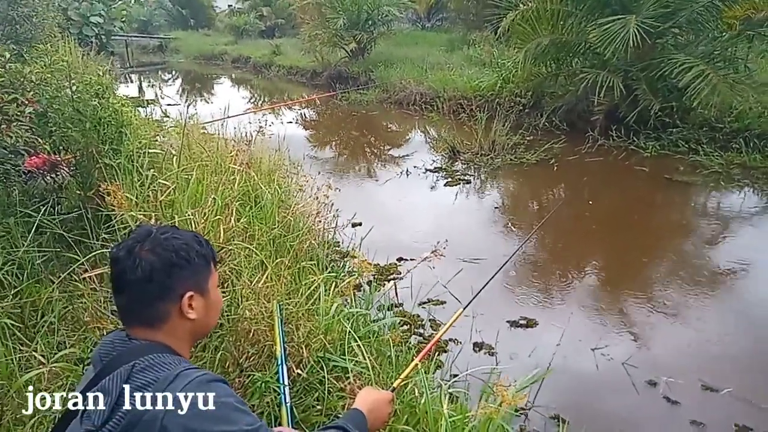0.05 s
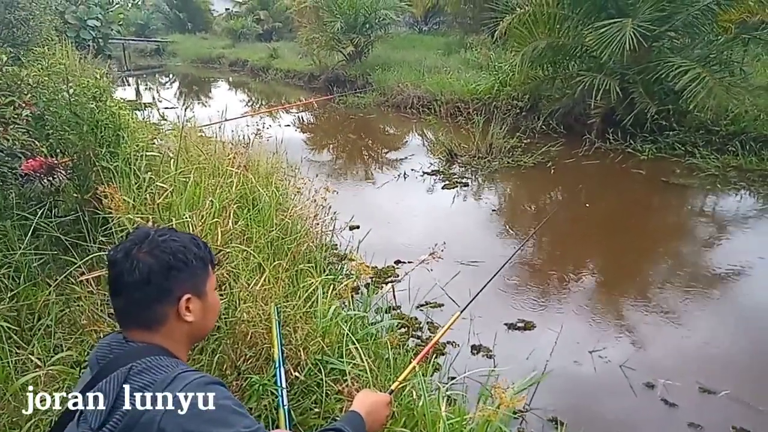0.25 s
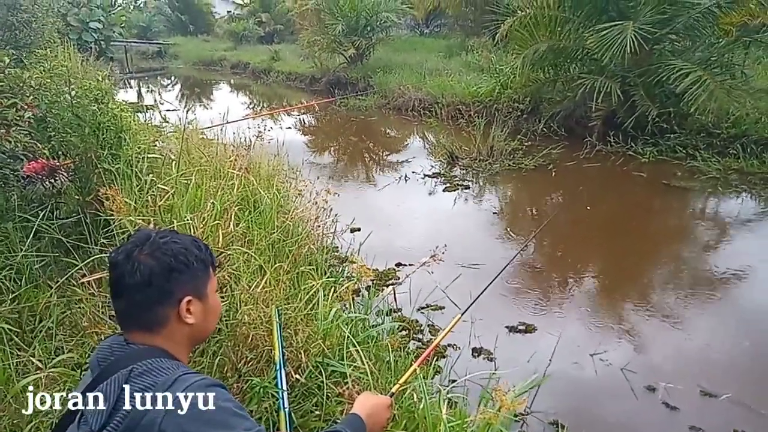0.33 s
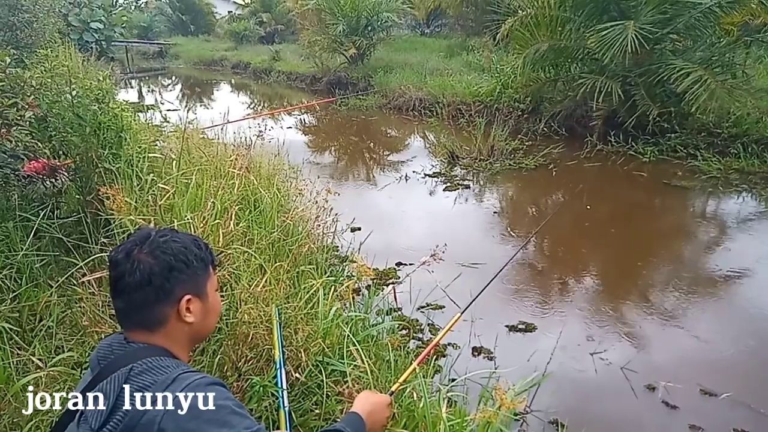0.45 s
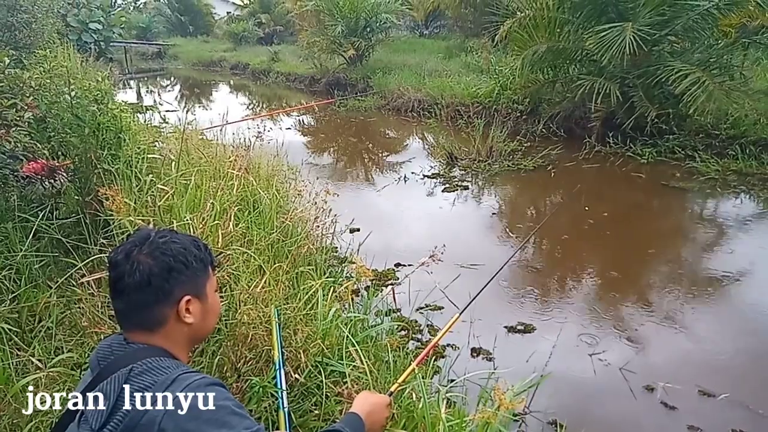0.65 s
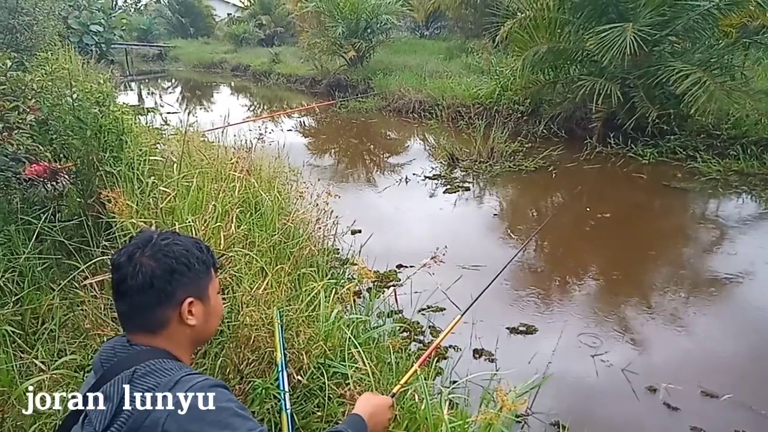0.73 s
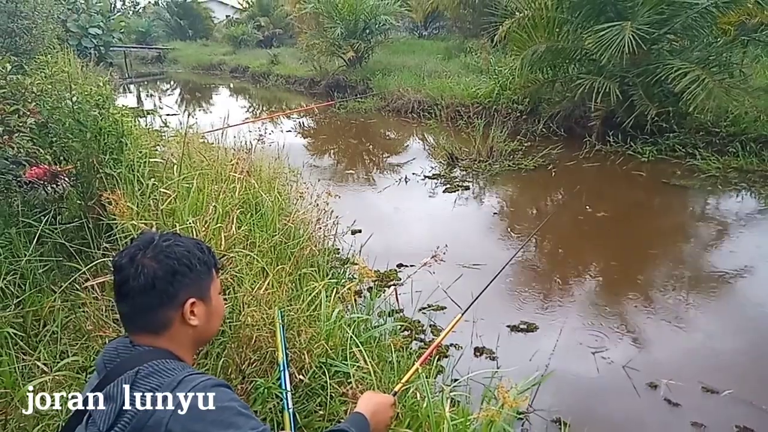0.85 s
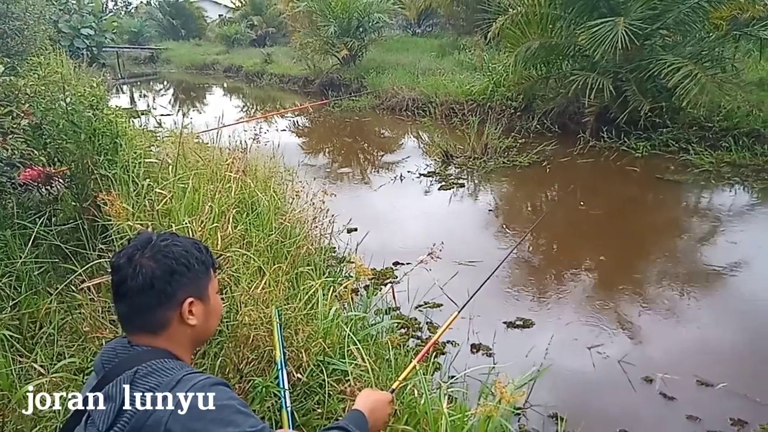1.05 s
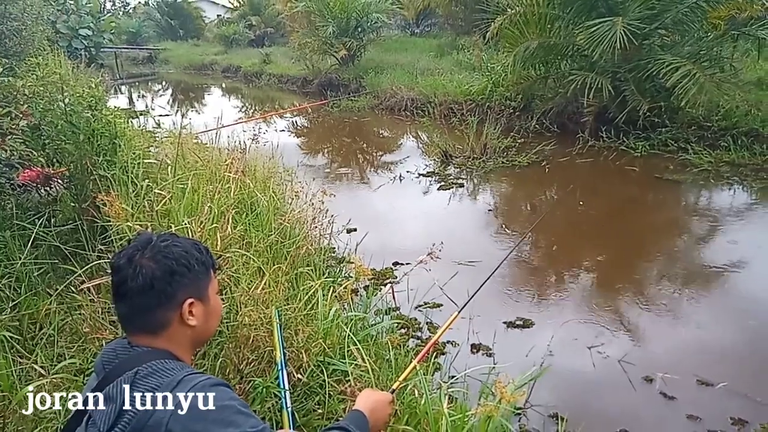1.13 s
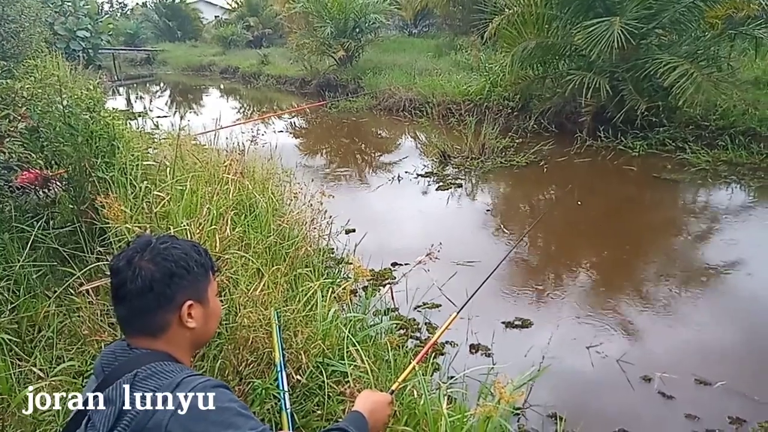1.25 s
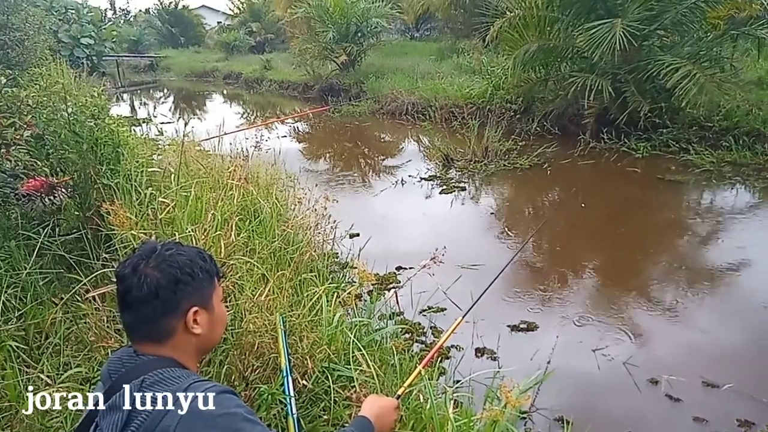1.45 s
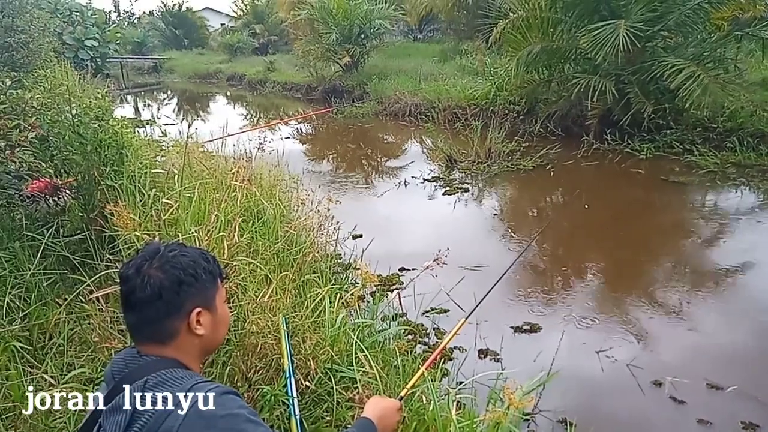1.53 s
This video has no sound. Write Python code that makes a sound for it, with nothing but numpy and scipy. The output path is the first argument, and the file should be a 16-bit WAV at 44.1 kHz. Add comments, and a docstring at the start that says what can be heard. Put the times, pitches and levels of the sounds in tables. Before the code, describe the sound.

A single plop sounds at the edge of a still pond, followed by a few falling drops and tiny bubbles. The banks echo faintly, while insects hiss and distant birds chirp over a low outdoor rumble.

```python
"""One plop at the edge of a still pond: a pocket of air booms and the water slaps shut over it,
then drops fall back and a few small bubbles rise. The air pockets ring as gliding sines, the slap is
a cluster of short tones, spray and drops are shaped noise and ticks, and the banks echo faintly.
Behind it insects hiss in the grass, far birds chirp, and a low outdoor rumble lies under it all."""
import sys
import numpy as np
from scipy import signal
from scipy.fft import rfft, irfft
from scipy.io import wavfile
from scipy.ndimage import uniform_filter1d

SR = 44100
rng = np.random.default_rng(int(sys.argv[2]) if len(sys.argv) > 2 else 0)


def digitize_waveform(pressure):
    """Quantize a signal to 16-bit integers and store it at the path in sys.argv[1].

    Rows of a 2-D input are taken as channels; values are limited to [-1, 1].
    """
    field = np.atleast_2d(pressure).T
    bounded = np.clip(field, -1, 1)
    quanta = np.round(bounded * 32767).astype(np.int16)
    wavfile.write(sys.argv[1], SR, quanta)


N = 70560

# EQ of the outdoor rumble (frequency [Hz], relative level [dB])
RUMBLE_EQ = [(20, -25), (40, -35), (60, -16), (90, -4), (125, 3), (165, -4), (220, -10), (300, -27),
             (420, -39), (800, -65)]
# fader ride of the rumble (time [s], level [dB])
RUMBLE_RIDE = [(0, -48.5), (.2, -48), (.47, -48.5), (.58, -50.5), (.79, -51.5), (0.851, -44), (.96, -54.5),
               (1.14, -49.5), (1.331, -53), (1.43, -48), (1.5, -51), (1.6, -50.5)]
# EQ of the insect bed (frequency [Hz], relative level [dB])
INSECT_EQ = [(5000, -37), (6850, -34.5), (7300, -9.5), (7750, -3.5), (8050, -4), (8350, -17), (8900, -15.5),
             (9250, -11), (9700, -20.5), (10500, -36.5), (15000, -54)]
# EQ of the far bird chorus (frequency [Hz], relative level [dB])
CHORUS_EQ = [(300, -7.5), (700, -6), (1200, -6), (1800, 2.5), (2200, 0), (2750, 2.5), (3300, -1),
             (3950, -5), (4250, -11), (4600, -11), (5300, -27), (7000, -32)]
# fader ride of the chorus (time [s], level [dB])
CHORUS_RIDE = [(0, -69), (.3, -65.5), (.6, -67.5), (.85, -66.5), (1.1, -65.5), (1.35, -69), (1.6, -71)]
# bird notes (time [s], length [s], level [dB], start pitch [Hz], middle pitch [Hz], end pitch [Hz])
BIRD_NOTES = [(.537, 0.042, -67.5, 1557, 1558, 1650), (.54, .034, -67, 2545, 2680, 2790),
              (0.716, 0.038, -65.5, 4120, 3890, 3970), (0.766, 0.12, -81.5, 6500, 6520, 6150),
              (.784, 0.027, -87, 11450, 11700, 11500), (0.84, 0.035, -63, 2670, 2844, 3170),
              (.86, 0.08, -86, 6200, 6470, 7100), (1.017, .026, -67, 2720, 2610, 2670),
              (1.045, 0.049, -69, 3166, 2941, 2640), (1.1, .069, -86, 11200, 11500, 11200),
              (1.159, 0.031, -66, 2684, 2870, 3110), (1.238, 0.022, -84, 11750, 11650, 11450),
              (1.254, 0.07, -84, 6550, 5950, 5100), (1.285, 0.066, -70.5, 1320, 1270, 1260),
              (1.466, 0.0414, -72.5, 2894, 2970, 3080)]
# drops falling back (time [s], level [dB], band centre [Hz], band width [octaves], t60 [s])
FALLING_DROPS = [(.276, -51.5, 1490, .5, .014), (0.307, -47.5, 2490, 0.46, .019),
                 (.3304, -44.5, 1970, 0.76, 0.021), (.3304, -49.5, 4550, 0.23, 0.023),
                 (0.3415, -46.5, 2220, .22, 0.021), (.3675, -47, 930, 0.97, 0.069),
                 (0.3924, -48, 4000, 0.17, 0.046), (0.393, -52, 3000, 0.11, 0.07),
                 (.4767, -47, 1714, 0.27, 0.032), (0.4769, -56, 4050, 0.14, 0.02),
                 (.778, -59.5, 4600, 0.064, 0.022)]
# EQ of the spray (frequency [Hz], relative level [dB])
SPRAY_EQ = [(100, -26), (220, 2.5), (450, 5), (900, 0), (1500, -6), (2300, -10), (3600, -11.5), (5000, -25),
            (7300, -31), (15000, -46.5)]
# ring of the water slapping shut (pitch [Hz], level [dB], attack [s], t60 [s])
SLAP_TONES = [(960, -27.5, 0.0018, 0.022), (1224, -31, 0.0017, 0.041), (1527, -23.5, 0.002, 0.013),
              (2120, -27.5, 0.003, 0.0073), (2787, -31.5, 0.0026, 0.0092), (3410, -39.5, .0025, 0.035),
              (4610, -37.5, .0014, 0.014), (5790, -44.5, 0.0007, 0.01)]
# air pockets in the water (time [s], pitch [Hz], level [dB], attack [s], t60 [s], glide [octaves/s])
AIR_POCKETS = [(0.2291, 510, -29, .0015, 0.021, 0), (0.2312, 303.5, -18, 0.0047, 0.053, -0.5),
               (0.2444, 306, -18.5, 0.00098, 0.032, -1.5), (0.2452, 397, -27, 0.0015, 0.047, 6),
               (.2425, 736, -35.5, 0.0032, 0.044, 2.5), (0.293, 259.5, -32.5, 0.0031, 0.086, 14.5),
               (.293, 735, -45, 0.0024, 0.046, 4.5), (0.32, 307, -38.5, 0.018, 0.023, -11),
               (.366, 300, -44.5, 0.0086, 0.09, -4), (0.404, 837, -56, 0.01, 0.082, 27.5),
               (0.448, 1043, -54.5, .0056, 0.021, -7), (.456, 853, -54.5, 0.018, 0.1, 5.5)]


def amp(db):
    """Decibels to gain."""
    return 10 ** (np.asarray(db) / 20)


def unit(x):
    """Scales to rms 1."""
    return x / np.sqrt(np.mean(x ** 2) + 1e-20)


def add(mix, start, sound):
    """Mixes a sound in at a start time in seconds."""
    part = mix[max(round(start * SR), 0):][:len(sound)]
    part += sound[:len(part)]


def eq_db(eq, hz):
    """Reads an EQ curve on a log-frequency axis."""
    freqs, db = np.transpose(eq)
    return np.interp(np.log(hz + 1), np.log(freqs), db)


def ride(points):
    """Gain over the whole scene from a fader ride."""
    return amp(np.interp(np.arange(N) / SR, *np.transpose(points)))


def envelope(t, db, attack, t60):
    """Linear attack to a peak level, then an exponential decay."""
    return np.minimum(t / attack, 1) * amp(db - 60 * np.maximum(t - attack, 0) / t60)


def colour(x, eq):
    """Applies an EQ, scaled so that white noise keeps its level."""
    gain = unit(amp(eq_db(eq, np.fft.rfftfreq(len(x), 1 / SR))))
    return irfft(rfft(x) * gain, len(x))


def band(count, hz, octaves):
    """Noise in one bell-shaped band, at rms 1."""
    freqs = np.fft.rfftfreq(count, 1 / SR) + 1
    bell = np.exp(-.5 * (np.log2(freqs / hz) / octaves) ** 2)
    return unit(irfft(rfft(rng.standard_normal(count)) * bell, count))


def drift(count, hz):
    """Random modulation of rms about 1, rolling off above hz."""
    rolloff = np.exp(-(np.fft.rfftfreq(N, 1 / SR) / hz) ** 2)
    return unit(irfft(rfft(rng.standard_normal(N)) * rolloff, N))[:count]


def patchy(eq, patch_db, frames, bins):
    """Shaped noise at rms 1 that shimmers in patches of time frames by frequency bins."""
    hz = np.fft.rfftfreq(1024, 1 / SR)
    real, imag, shimmer = rng.standard_normal((3, N // 256 + 5, len(hz)))
    patches = unit(uniform_filter1d(uniform_filter1d(shimmer, frames, axis=0), bins, axis=1))
    spectra = (real + 1j * imag) * amp(eq_db(eq, hz) + patch_db * patches)
    return unit(signal.istft(spectra.T, nperseg=1024, noverlap=768)[1][:N])


def scatter(x, t60):
    """Diffuse echo from the banks and trees, wet only."""
    t = np.arange(SR) / SR
    tail = rng.standard_normal(len(t)) * amp(-60 * t / t60) * np.minimum(t / 0.0089, 1)
    return signal.fftconvolve(x, tail / np.linalg.norm(tail))[:N]


def outdoor_air():
    """The bottom layer: lumpy low rumble, a soft fading drone above it and a very faint even hiss."""
    t = np.arange(N) / SR
    rumble = colour(rng.standard_normal(N), RUMBLE_EQ) * ride(RUMBLE_RIDE)
    drone = band(N, hz=265.4, octaves=0.27) * amp(-61 - 8 * t)
    hiss = amp(-86.5) * rng.standard_normal(N)
    return rumble + drone + hiss


def insects():
    """Massed insects blend into a steady high sizzle."""
    return amp(-70.5) * patchy(INSECT_EQ, patch_db=2, frames=3, bins=8)


def birds():
    """Thin whistled notes, blurred by distance, over a chorus too far away to tell apart."""
    out = np.zeros(N)
    # one bird repeats a plain low note
    hoots = [(start, .07, -70, 984, 984, 984) for start in np.arange(.662, N / SR, .431)]
    for start, length, db, *pitches in BIRD_NOTES + hoots:
        progress = np.linspace(0, 1, int(length * SR))
        contour = np.polyval(np.polyfit([0, .5, 1], pitches, 2), progress)
        hz = contour + 30 * drift(len(progress), hz=119)
        flutter_db = 2.5 * drift(len(progress), hz=90)
        level = amp(db + flutter_db) * np.sin(np.pi * progress)
        add(out, start, level * np.sin(2 * np.pi * np.cumsum(hz) / SR))
    reverb = amp(-4.5) * scatter(out, t60=0.28)
    chorus = ride(CHORUS_RIDE) * patchy(CHORUS_EQ, patch_db=3.5, frames=8, bins=5)
    return out + reverb + chorus


def drops():
    """Larger drops hit the water, each in its own band: a hard tick, then a short fizz."""
    out, t = np.zeros(N), np.arange(4096) / SR
    fizz_attack_s, tick_boost_db = 0.00064, 1.5
    for start, db, hz, octaves, t60 in FALLING_DROPS:
        age = np.pi * hz * octaves * t  # a wider band gives a snappier tick
        tick = age * np.exp(1 - age) * np.sin(2 * np.pi * hz * t)
        fade = amp(-60 * t / t60)
        fizz = band(len(t), hz, octaves) * np.minimum(t / fizz_attack_s, 1) * fade
        fizz *= np.linalg.norm(fade) / np.linalg.norm(fizz)
        add(out, start, amp(db) * (amp(tick_boost_db) * tick + fizz))
    return out


def spray():
    """A puff of spray with the slap, then a patter of fine droplets, duller than the puff."""
    out, t = np.zeros(N), np.arange(SR // 2) / SR
    puff_t60, patter_hold_s, patter_t60, droplets_per_s = 0.039, 0.13, 0.17, 1400
    puff = rng.standard_normal(len(t)) * amp(-30 - 60 * t / puff_t60)
    droplets = unit(rng.standard_normal(len(t)) * (rng.random(len(t)) < droplets_per_s / SR))
    patter = droplets * amp(-54.5 - 60 * np.maximum(t - patter_hold_s, 0) / patter_t60)
    patter = signal.sosfilt(signal.butter(2, 5000, "lowpass", fs=SR, output="sos"), patter)
    add(out, start=.2425, sound=puff + patter)
    return colour(out, SPRAY_EQ)


def slap():
    """Water shuts with a wet, barely ringing smack: the top comes first, the mids swell just after."""
    out, t = np.zeros(N), np.arange(SR // 20) / SR
    for hz, db, attack, t60 in SLAP_TONES:
        tone = envelope(t, db, attack, t60) * np.sin(2 * np.pi * hz * t)
        add(out, start=.2419, sound=tone)
    return out


def bubbles():
    """The body of the plop: each air pocket swells, rings at a gliding pitch and wobbles as it dies."""
    out, t = np.zeros(N), np.arange(SR // 6) / SR
    wobble_octaves, wobble_onset_s = 0.075, 0.0406
    for start, hz, db, attack, t60, glide in AIR_POCKETS:
        wobble = wobble_octaves * np.minimum(t / wobble_onset_s, 1) ** 2 * drift(len(t), hz=90.4)
        pitch = hz * 2 ** (np.minimum(glide * t, 1) + wobble)  # the glide stops an octave up
        add(out, start, envelope(t, db, attack, t60) * np.sin(2 * np.pi * np.cumsum(pitch) / SR))
    return out


def scene():
    """Mono mix of plop, bank echo and pond ambience; only the boom returns from the far bank."""
    boom = bubbles()
    plop = boom + slap() + spray() + drops()
    near_banks = amp(-17.5) * scatter(plop, t60=0.54)
    far_bank = amp(-30) * scatter(boom, t60=1.17)
    return (plop + near_banks + far_bank + birds() + insects() + outdoor_air())[None]


def record(dry):
    """A steep high cut at 15.5 kHz on the whole mix."""
    high_cut = signal.firwin(511, 15500, window=("kaiser", 9), fs=SR)
    return signal.oaconvolve(dry, high_cut[None], "same")


dry = scene()
out = record(dry)
digitize_waveform(out)
```